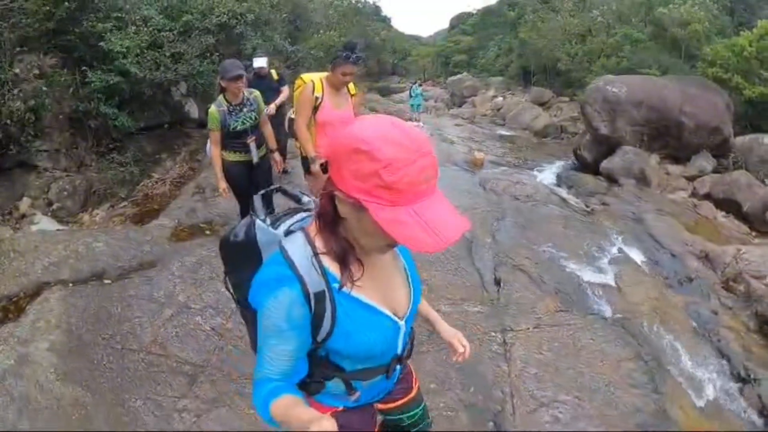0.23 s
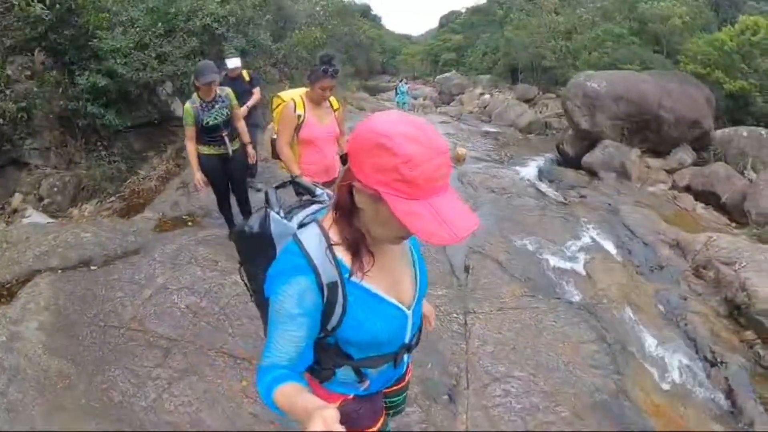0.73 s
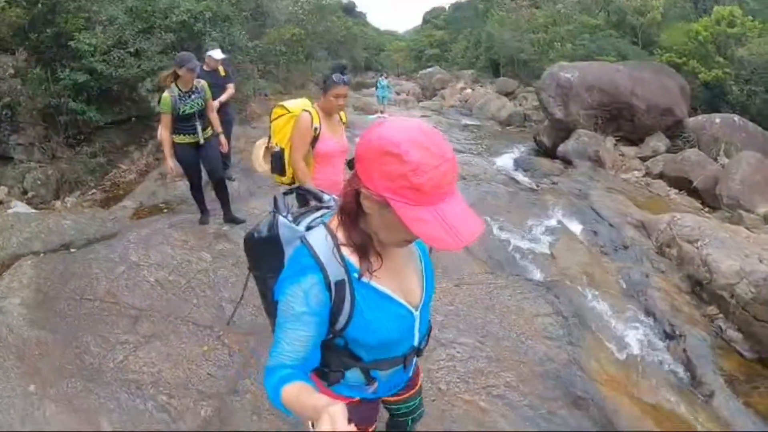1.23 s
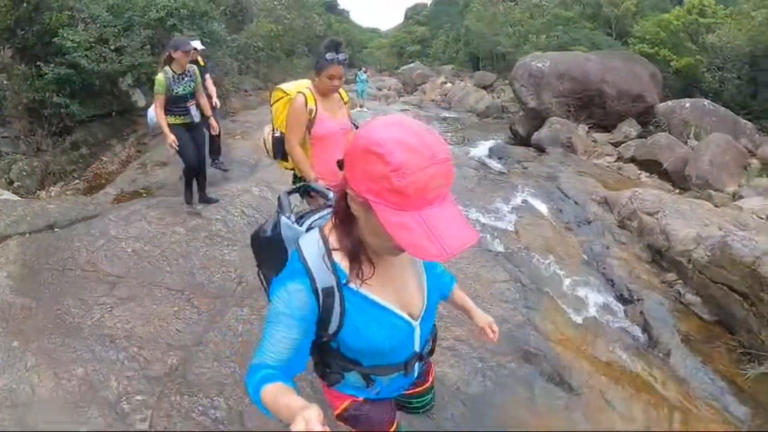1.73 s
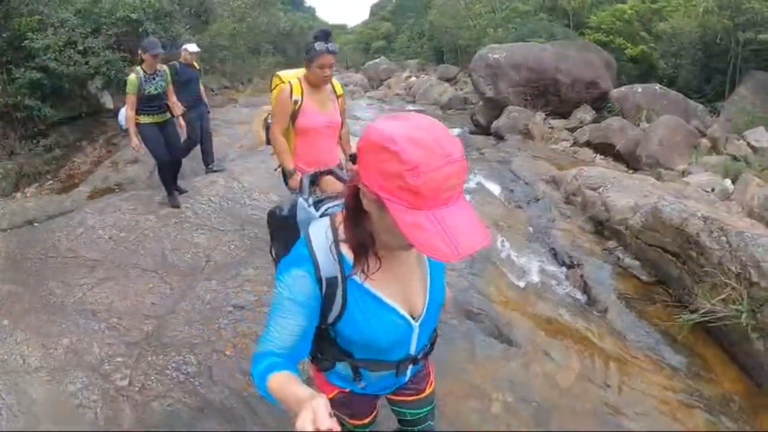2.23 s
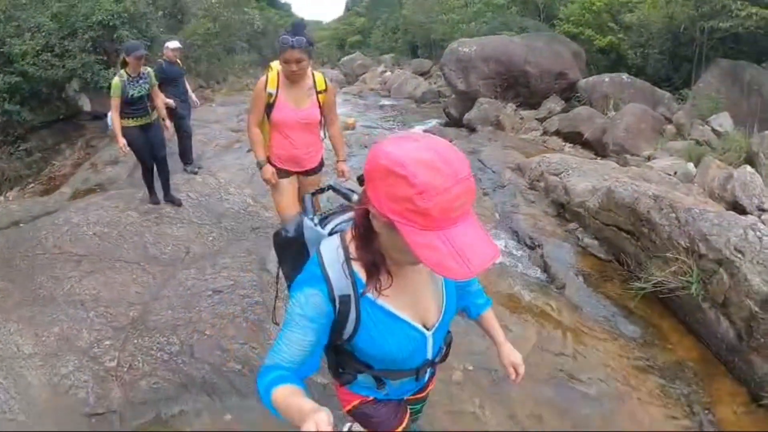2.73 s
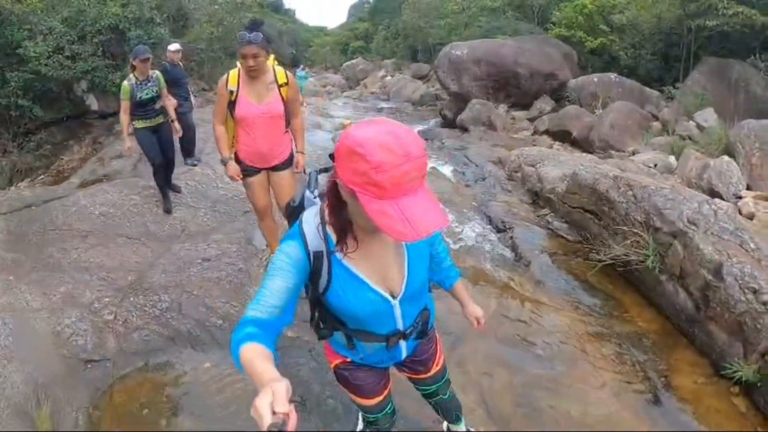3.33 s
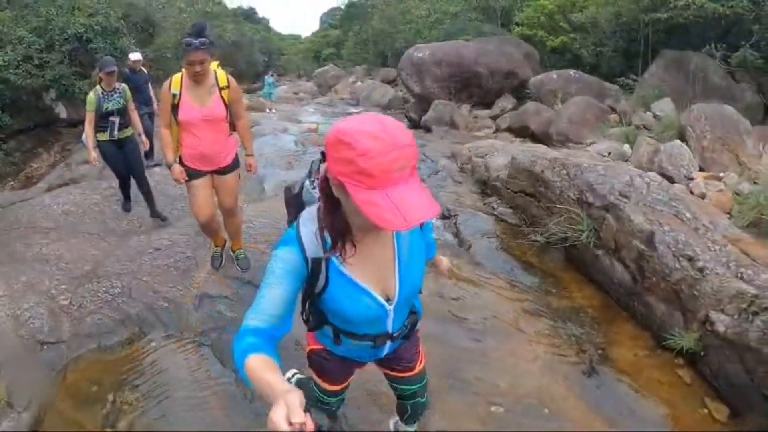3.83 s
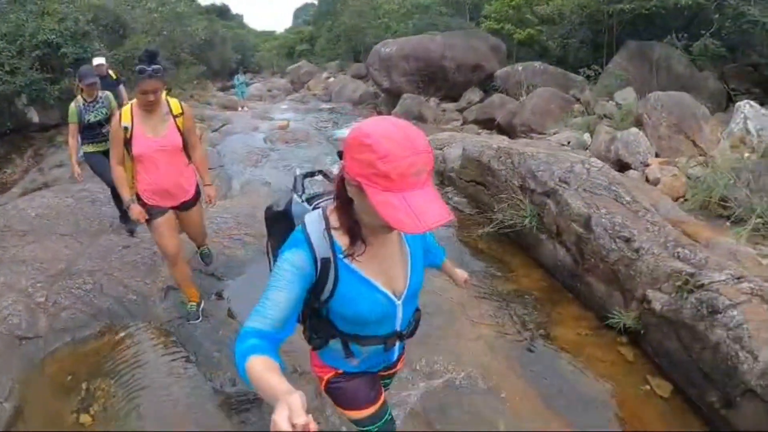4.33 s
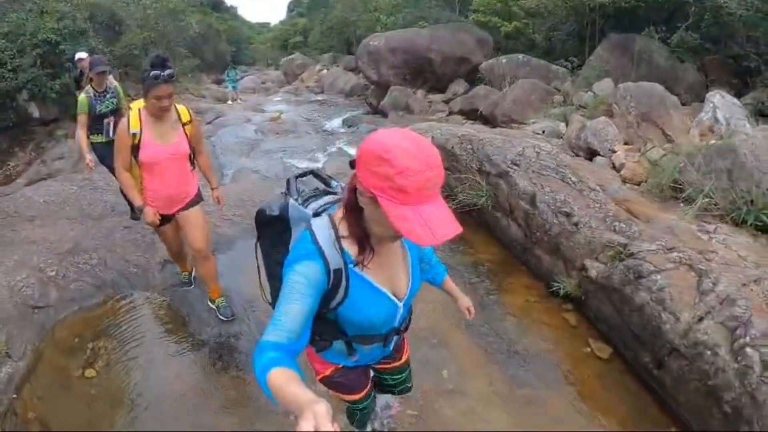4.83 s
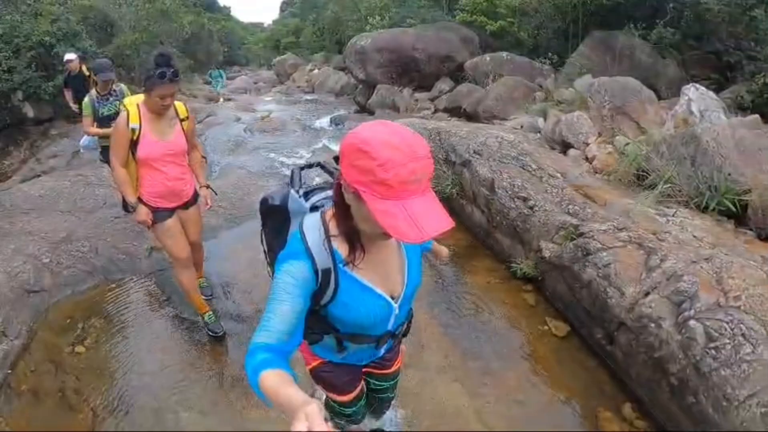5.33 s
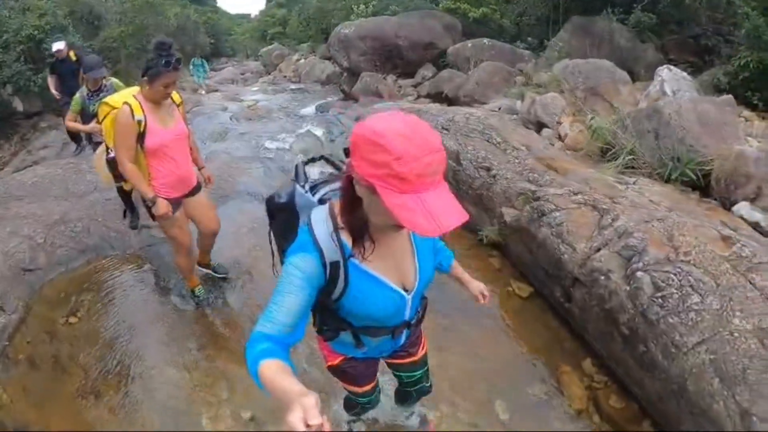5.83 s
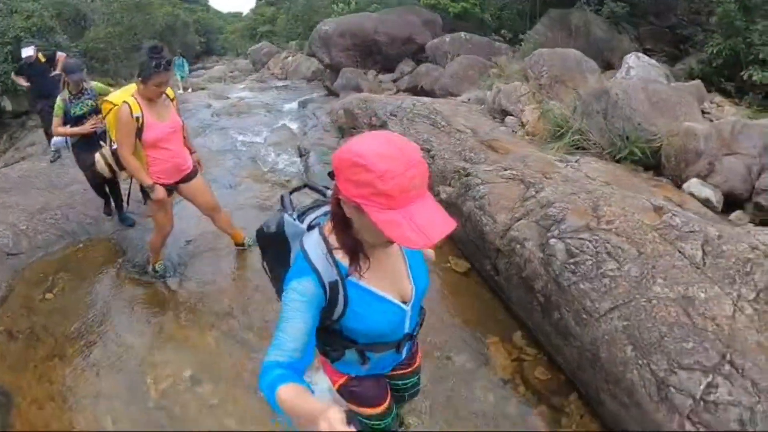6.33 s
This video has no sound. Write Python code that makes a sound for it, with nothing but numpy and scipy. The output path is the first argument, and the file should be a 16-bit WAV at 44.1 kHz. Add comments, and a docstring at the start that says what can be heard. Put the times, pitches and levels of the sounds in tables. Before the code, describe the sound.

Outdoors on a rocky stream bed, shallow water bubbles and rushes steadily beneath low, uneven wind buffeting on a close microphone. A barely audible thin whistle, light ticks and a cluster of dull knocks on the camera pole come first. A few wet footsteps on stone follow, giving way to sloshes, hollow plops and the bubbly swish of legs wading, with the strongest splashes near the end.

```python
"""A shallow stream rushes over bare rock, full of small bubbles, with cascades roaring upstream.
Hikers wade in: soles slap wet rock, feet slosh and trap air that plops, legs drag a bubbly wake.
Wind rumbles on the microphone of a hand-held waterproof camera, whose pole takes a few dull knocks.
Small ticks sound close by; a faint, thin whistle comes twice early on."""
import sys
import numpy as np
from scipy import signal
from scipy.fft import rfft, irfft, next_fast_len
from scipy.io import wavfile
from scipy.ndimage import uniform_filter1d, map_coordinates

SR = 44100
rng = np.random.default_rng(int(sys.argv[2]) if len(sys.argv) > 2 else 0)


def dump(signal):
    """Clip the signal to [-1, 1] and save it as 16-bit WAV at the path in sys.argv[1]."""
    limited = np.clip(np.atleast_2d(signal).T, -1, 1)
    pcm = np.round(limited * 32767).astype(np.int16)
    wavfile.write(sys.argv[1], SR, pcm)


N = 291060
T = np.arange(N) / SR

# noise spectrum of pole scuffs and sole spray: freq_hz, density_db
SCUFF_SPECTRUM = [(80, -17), (200, 2.5), (500, 14.5), (800, -0.5), (1050, -15), (1550, -1.5), (1950, -20.5),
                  (4000, -19.5), (9000, -49)]


def stream():
    """Cascades roar upstream; nearer water rushes over the rock, full of small bubbles."""
    # cascades: freq_hz, density_db
    roar_spectrum = [(60, 2.5), (200, -2.5), (330, -7), (450, -6.5), (570, -8), (740, -2.5), (850, 2),
                     (1060, 3), (1160, -3.5), (1280, -20.5), (1600, -12), (2600, -17), (7000, -41),
                     (9000, -73.5)]
    # near water: freq_hz, density_db
    rush_spectrum = [(150, -7), (420, 3), (700, -3.5), (1050, 7.5), (1300, -3.5), (1520, 3), (1750, -3),
                     (2200, -0.5), (2650, -9), (5500, -4.5), (6100, -10.5), (7300, -10), (8200, -25),
                     (10500, -38), (13500, -52)]
    # near water along the walk: time_s, level_db
    rush_levels = [(0, -55.5), (1.25, -53.5), (1.7, -52), (2.6, -49.5), (3.15, -51), (4.9, -50),
                   (5.95, -47.5), (6.3, -46.5), (6.55, -50.5)]
    fade_db_per_s = 1  # the cascades fall behind
    pool_s, pool_rise_s, pool_db = 5.5, 0.44, 7  # the roar swells again at the pool
    roar_db = -48 - fade_db_per_s * T + pool_db * (1 + np.tanh((T - pool_s) / pool_rise_s)) / 2
    roar = amp(roar_db) * coloured(churn(patchy_db=2.0), roar_spectrum)
    fizz = bubbles(count=6000, centre_hz=3252, log_spread=0.508, decay_cycles=3.7, spread_db=1.5)
    gurgle = bubbles(count=600, centre_hz=689, log_spread=0.514, decay_cycles=2.9, spread_db=2.5)
    water = churn(patchy_db=1.15) + amp(-13.5) * fizz + amp(-22.0) * gurgle
    rush_db = np.interp(T, *np.transpose(rush_levels)) + 0.33 * wobble(16)
    return roar + amp(rush_db) * coloured(water, rush_spectrum)


def churn(patchy_db):
    """Churning water: mid and side noise that swells in small patches of time and pitch."""
    spectra = signal.stft(rng.standard_normal((2, N)), nperseg=512)[2]
    patches = uniform_filter1d(rng.standard_normal(spectra.shape[1:]), size=6, axis=0)
    patches = uniform_filter1d(patches, size=10, axis=1)
    return unit(signal.istft(spectra * amp(patchy_db * unit(patches)), nperseg=512)[1][:, :N])


def bubbles(count, centre_hz, log_spread, decay_cycles, spread_db):
    """Damped sines that rise in pitch as the bubbles surface; mid and side."""
    when, size, place = rng.random((count, 3)).T[..., None]
    hz = np.clip(centre_hz * np.exp(log_spread * rng.standard_normal((count, 1))), 250, 9000)
    offsets = np.arange(768)
    age = hz * offsets / SR / decay_cycles
    phase = 2 * np.pi * decay_cycles * age * (1 + 0.03 * age)
    rings = np.sin(phase) * np.exp(-age) * (1 - np.exp(-6 * age))
    rings *= amp(-spread_db * np.log(size + .01))
    samples = ((when * N).astype(int) + offsets).ravel()
    mid_side = [np.bincount(samples, (rings * gain).ravel(), N)[:N] for gain in (1, 2 * place - 1)]
    return unit(np.array(mid_side))


def steps():
    """Each foot pushes up a slosh of bubbly water and traps one pocket of air that plops."""
    # feet entering water: time_s, slosh_db, slosh_width_s, plop_hz, plop_db
    plunges = [(3.9, -50, 0.031, 164, -36), (4.563, -43, 0.047, 265, -43), (4.779, -63, .02, 632, -39.5),
               (4.963, -49, 0.015, 335, -44.5), (5.226, -48, 0.016, 362, -39),
               (6.183, -42.5, 0.02, 540, -33.5), (6.281, -43, 0.018, 416, -35),
               (6.405, -51, 0.026, 857, -38)]
    # displaced water: freq_hz, density_db
    slosh_spectrum = [(120, -3), (350, 7.5), (520, 3.5), (800, 5), (1050, -2.5), (1350, -1.5),
                      (2100, -10.5), (2800, -15), (5200, -8), (7200, -24), (8500, -29), (13000, -65)]
    plop_t60_s, plop_attack_s = 0.1, 0.00098
    swell, plops = np.zeros((2, N))
    t = np.arange(SR // 5) / SR
    envelope = amp(-60 * t / plop_t60_s) * (1 - np.exp(-t / plop_attack_s))
    for time_s, slosh_db, width_s, plop_hz, plop_db in plunges:
        swell += amp(slosh_db) / np.cosh(np.clip(2 * (T - time_s) / width_s, -20, 20))
        chirp = np.sin(2 * np.pi * plop_hz * t * (1 + 2.2 * t))
        add(plops, time_s, amp(plop_db) * envelope * chirp)
    foam = bubbles(count=2000, centre_hz=1480, log_spread=.8, decay_cycles=3, spread_db=3)
    water = churn(patchy_db=1) + amp(-16) * foam
    return swell * coloured(water, slosh_spectrum) + centred(plops)


def wading():
    """Each stride drags a wake of breaking bubbles."""
    # legs in shallow water: crest_s, level_db, half_length_s
    strides = [(3.727, -57.5, 0.24), (4.412, -52.5, 0.019), (5.338, -52.5, 0.08), (5.513, -51, 0.038),
               (5.935, -51.5, 0.046), (6.201, -67.5, 0.045), (6.37, -55.5, 0.034)]
    # wake: freq_hz, density_db
    wake_spectrum = [(200, -11.5), (380, 4), (600, -2), (800, 1.5), (1250, -4.5), (1550, -1), (2200, -7.5),
                     (2700, -10), (5200, -7.5), (7500, -14.5), (9000, -49.5)]
    swell = sum(amp(db) * hump(crest_s, half_length_s) for crest_s, db, half_length_s in strides)
    foam = bubbles(count=3000, centre_hz=1830, log_spread=0.333, decay_cycles=3.8, spread_db=2.0)
    return swell * coloured(churn(patchy_db=-4) + amp(-8.0) * foam, wake_spectrum)


def slaps():
    """A wet sole lands flat: a short hollow clap and a little spray."""
    # soles on wet rock: start_s, level_db, centre_hz
    landings = [(1.636, -39, 450), (2.329, -37, 950), (2.4935, -35, 1600), (3.031, -35.5, 250),
                (3.098, -35, 290), (3.3537, -24.5, 600), (3.549, -29.5, 800), (6.178, -26, 700)]
    # modes of the clap: freq_hz, level_db, t60_s
    sole_modes = [(258, -2.5, 0.018), (446, 2.5, 0.04), (526, 4.5, 0.019), (744, -21.5, .02),
                  (990, 1.5, .022), (1320, 1, .018), (1516, 2, 0.024)]
    attack_s, spray_db, spray_t60_s = .001, -10.5, 0.031
    claps, spray = np.zeros((2, N)), np.zeros(N)
    t = np.arange(SR // 10) / SR
    rise = 1 - np.exp(-t / attack_s)
    for start_s, db, centre_hz in landings:
        add(claps, start_s, amp(db) * rise * struck(sole_modes, centre_hz, t, width_oct=1.3))
        add(spray, start_s, amp(db + spray_db - 60 * t / spray_t60_s) * rise)
    return claps + spray * coloured(rng.standard_normal((2, N)), SCUFF_SPECTRUM)


def struck(modes, centre_hz, t, width_oct):
    """Mid and side rings of peak 1; the contact excites the modes near centre_hz most."""
    ring = 0
    for hz, db, t60_s in modes:
        envelope = amp(db + 2 * rng.standard_normal() - 60 * t / t60_s)
        excitation = 1 / (1 + (np.log2(hz / centre_hz) / width_oct) ** 2)
        detuned_hz = hz * (1 + rng.normal(0, 0.033))
        ring += excitation * envelope * np.sin(2 * np.pi * (detuned_hz * t + rng.random((2, 1))))
    return ring / np.abs(ring).max(axis=1, keepdims=True)


def wind():
    """Gusts on a light breeze press on the housing: deep rumble and a quicker flutter of small eddies."""
    # gusts: crest_s, level_db, half_length_s, flutter_offset_db
    gusts = [(0.162, -36.5, 0.069, 0.5), (0.325, -38, 0.071, -0.5), (0.587, -26.5, 0.083, -15.5),
             (0.986, -21, 0.073, -10), (1.077, -23, .03, -4), (1.27, -30, 0.16, -8), (1.479, -34, 0.039, 2),
             (1.79, -23.5, .05, -9), (1.899, -26.5, 0.018, -5.5), (2.105, -31.5, 0.11, -10),
             (2.309, -25, 0.045, -16), (2.597, -32, 0.087, -11.5), (2.874, -23.5, .055, -14.5),
             (3.03, -24.5, 0.072, -14), (3.243, -26, 0.057, -21), (3.444, -33.5, 0.097, -4),
             (3.652, -24.5, 0.07, -16.5), (3.773, -24.5, 0.038, -8), (3.93, -24, 0.073, -7.5),
             (4.18, -29, 0.069, -8), (4.461, -23, 0.062, -12.5), (4.584, -20, .03, -15.5),
             (4.703, -25, 0.041, -21.5), (4.97, -35, 0.067, -7.5), (5.363, -27, 0.094, -10.5),
             (5.748, -31.5, 0.27, -13), (6.09, -28, 0.074, -13), (6.287, -21, 0.077, -19),
             (6.502, -30, 0.26, -17.5)]
    # deep pressure swings: freq_hz, density_db
    rumble_spectrum = [(4, -49.5), (12, 4.5), (25, 2.5), (36, -4.5), (52, -12.5), (80, -33), (120, -33.5),
                       (250, -113.5), (500, -140)]
    # small eddies: freq_hz, density_db
    flutter_spectrum = [(40, 5.5), (72, 12), (100, 2.5), (130, -9), (180, -13.5), (260, -27.5),
                        (600, -37.5), (2500, -120)]
    rumble_power, flutter_power = amp(-35.2) ** 2, amp(-47.5) ** 2  # breeze between gusts
    for crest_s, db, half_length_s, flutter_offset_db in gusts:
        gust = amp(db) * hump(crest_s, half_length_s, edge=2.4)
        rumble_power += gust ** 2
        flutter_power += (amp(flutter_offset_db) * gust) ** 2
    rumble = even_noise(rumble_spectrum) * amp(4.5)
    flutter = even_noise(flutter_spectrum) * amp(2 * wobble(22))
    return np.sqrt(rumble_power) * rumble + np.sqrt(flutter_power) * flutter


def knocks():
    """A soft blow gives one short push, rings the pole's damped modes and drags out a brief scuff."""
    # blows on the pole: start_s, level_db, scuff_s, scuff_offset_db, thud_offset_db
    blows = [(0.938, -27, .028, -2, -15), (.974, -39, .025, -2, -7), (1.066, -32, .02, 3, -11),
             (1.074, -29, .028, 0, -8), (1.081, -33, .014, -1, -13), (1.331, -38.5, .022, -1, -7),
             (1.359, -35, .025, 0, -8)]
    # modes of pole and housing: freq_hz, level_db, t60_s
    pole_modes = [(274, -6, .022), (414, 4.5, .026), (530, 2.5, .026), (760, -2, .022), (1034, -1, .04),
                  (1540, -2, .0074)]
    attack_s, thud_half_width_s = 0.0015, 0.00049
    hits, scuffs = np.zeros((2, N))
    t = np.arange(SR // 5) / SR
    rise = 1 - np.exp(-t / attack_s)
    thud_time = t / thud_half_width_s - 4
    thud = (thud_time ** 2 - 1) * np.exp(-thud_time ** 2 / 2)
    for start_s, db, scuff_s, scuff_offset_db, thud_offset_db in blows:
        ring = 0
        for hz, mode_db, t60_s in pole_modes:
            envelope = rise * amp(mode_db + rng.standard_normal() - 60 * t / t60_s)
            ring += envelope * np.sin(2 * np.pi * (hz * t + rng.random()))
        add(hits, start_s, amp(db - 2) * ring / np.abs(ring).max() + amp(db + thud_offset_db) * thud)
        add(scuffs, start_s, amp(db + scuff_offset_db - 6 - 20 * t / scuff_s) * rise)
    return centred(hits) + scuffs * coloured(rng.standard_normal((2, N)), SCUFF_SPECTRUM)


def ticks():
    """Close, dry ticks: a hard snap and fast-dying modes; three fainter ticks scatter around each."""
    # sharp ticks: start_s, level_db, centre_hz, snap_offset_db
    sharp = [(0.08, -39.5, 3980, -21), (.111, -38.5, 5000, -18), (.152, -35, 6000, -29.5),
             (.314, -42, 6000, -23), (0.419, -39.5, 5000, -20.5), (1.234, -45.5, 6550, -16.5),
             (1.405, -34.5, 3100, -12), (1.5725, -40.5, 5500, -25), (1.629, -41, 5000, -24),
             (1.635, -33, 4500, -27), (1.663, -37.5, 4000, -18.5), (1.953, -33.5, 3300, -26.5),
             (2.059, -33.5, 4600, -19), (2.331, -29, 5400, -25.5), (2.3672, -28, 4550, -26),
             (2.418, -36, 4000, -25), (2.473, -35, 5230, -18), (2.4944, -34, 2400, -33),
             (3.5525, -32, 3300, -43), (3.593, -36, 4300, -27), (3.663, -34.5, 3980, -26),
             (3.677, -35.5, 4630, -30), (4.643, -34, 5540, -30), (5.4498, -35, 4600, -27.5),
             (5.7328, -32.5, 4770, -22)]
    # modes of a tick: freq_hz, level_db, t60_s
    tick_modes = [(1140, 7.5, 0.01), (2030, 8, 0.0065), (3370, 0, 0.0076), (3900, -7, 0.017),
                  (4696, 3.5, 0.0084), (5580, 6, 0.0046), (6300, 0, 0.0057), (7100, -5, 0.015)]
    scatter_s, attack_s, snap_t60_s = .03, .0002, 0.0041
    track = np.zeros((2, N))
    t = np.arange(SR // 20) / SR
    snap_band = signal.butter(3, [5500, 12000], "bandpass", fs=SR, output="sos")
    faint = [(start_s + scatter_s * shift, db - 14.5 + 3 * accent, *timbre)
             for start_s, db, *timbre in sharp for shift, accent in rng.standard_normal((3, 2))]
    for start_s, db, centre_hz, snap_offset_db in list(sharp) + faint:
        ring = struck(tick_modes, centre_hz, t, width_oct=0.83) * (1 - np.exp(-t / attack_s))
        ring /= np.abs(ring).max(axis=1, keepdims=True)
        snap = unit(signal.sosfilt(snap_band, rng.standard_normal((2, len(t)))))
        snap *= amp(snap_offset_db - 60 * t / snap_t60_s)
        add(track, start_s, amp(db) * (ring + snap))
    return track


def whistle():
    """A thin, far tone: each note swells, holds with a slight waver, then sags in pitch as it dies."""
    # notes: start_s, held_s, pitch_hz, level_db, waver_hz
    notes = [(0, .72, 828, -52.5, 2.5), (1.95, .37, 850, -56.5, 11)]
    rise_share, release_s, sag_hz = .55, .07, 50
    track = np.zeros(N)
    for start_s, held_s, pitch_hz, db, waver_hz in notes:
        rise = np.clip((T - start_s) / (rise_share * held_s), 0, 1) ** .5
        dying = np.maximum(T - start_s - held_s, 0) / release_s
        hz = pitch_hz + waver_hz * wobble(20) - sag_hz * np.minimum(dying / 2, 1)
        envelope = amp(db + 4.5 * wobble(11)) * rise * np.exp(-dying ** 2)
        track += envelope * unit(np.sin(2 * np.pi * np.cumsum(hz) / SR))
    return track


def amp(db):
    """Decibels to gain."""
    return 10 ** (np.asarray(db) / 20)


def unit(x):
    """x at rms 1."""
    return x / np.sqrt(np.mean(x ** 2) + 1e-20)


def gain_at(spectrum, hz):
    """Gain of (freq_hz, db) points, read on a log frequency axis."""
    freq_hz, db = np.transpose(spectrum)
    return amp(np.interp(np.log(hz + 1), np.log(freq_hz + 1), db))


def wobble(knots_per_s):
    """A smooth random curve."""
    return map_coordinates(rng.standard_normal(int(N * knots_per_s / SR) + 4), [T * knots_per_s])


def hump(crest_s, half_length_s, edge=2):
    """A smooth rise and fall; a higher edge gives steeper flanks."""
    return np.exp(-.5 * np.abs((T - crest_s) / half_length_s) ** edge)


def filtered(x, response):
    """x through a frequency response."""
    size = next_fast_len(N + SR // 2)
    return irfft(rfft(x, size) * response(np.fft.rfftfreq(size, 1 / SR)), size)[..., :N]


def coloured(x, spectrum):
    """x through a (freq_hz, db) spectrum, at rms 1."""
    return unit(filtered(x, lambda hz: gain_at(spectrum, hz)))


def even_noise(spectrum):
    """Coloured noise with its short-term level evened out, at rms 1."""
    noise = coloured(rng.standard_normal(N), spectrum)
    power = np.abs(uniform_filter1d(noise ** 2, size=3200))
    return unit(noise / np.sqrt(power + 0.079))


def centred(x):
    """x as mid, with a silent side."""
    return x * np.array([[1], [0]])


def add(track, start_s, sound):
    """Mix a sound into a track."""
    start = max(round(start_s * SR), 0)
    part = track[..., start:start + sound.shape[-1]]
    part += sound[..., :part.shape[-1]]


def scene():
    """The two microphone ports hear nearly the same bass, wind included, but differ in the treble."""
    # stereo width: freq_hz, side_db
    width = [(100, -40), (300, -24.5), (480, -34), (950, -26.5), (1130, -12), (1270, 0.5), (1550, -6.5),
             (2000, -6.5), (2400, -18), (2750, -17), (3150, -3), (3700, -3), (4700, -4), (6000, -13.5),
             (7000, -16), (8200, 5), (11000, 2.5)]
    mid, side = stream() + steps() + wading() + slaps() + ticks() + knocks()
    mid = mid + wind() + whistle()
    side = filtered(side, lambda hz: gain_at(width, hz))
    # the mix leans right, toward the stream: that port hears it slightly sooner and louder
    lean = filtered(mid, lambda hz: -gain_at(width, hz) * (0.15 + .45j) / (1 + (hz / 6500) ** 8))
    side = 0.74 * side + lean
    return np.array([mid + side, mid - side])


def record(dry):
    """The sealed housing adds its resonances, the microphone a faint hiss; the top is cut off."""
    # housing resonances: centre_hz, width_hz, gain_db
    resonances = [(1912, 124, 3.5), (3440, 590, 3.5), (5600, 300, 2), (6750, 280, 3.5)]
    top_hz = 13500

    def housing(hz):
        boost_db = sum(db / (1 + (2 * (hz - centre_hz) / width_hz) ** 2)
                       for centre_hz, width_hz, db in resonances)
        return amp(boost_db) * (hz < top_hz)

    hiss = amp(-85.5) * rng.standard_normal(N)
    return filtered(dry + hiss, housing)


dry = scene()
out = record(dry)
dump(out)
```